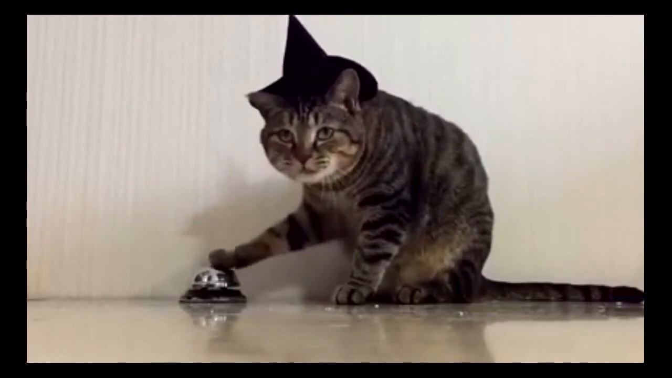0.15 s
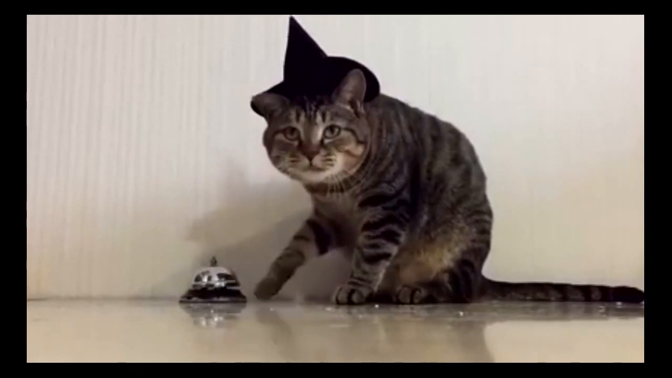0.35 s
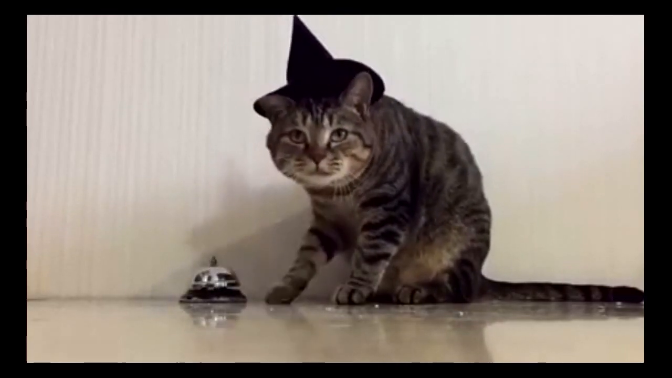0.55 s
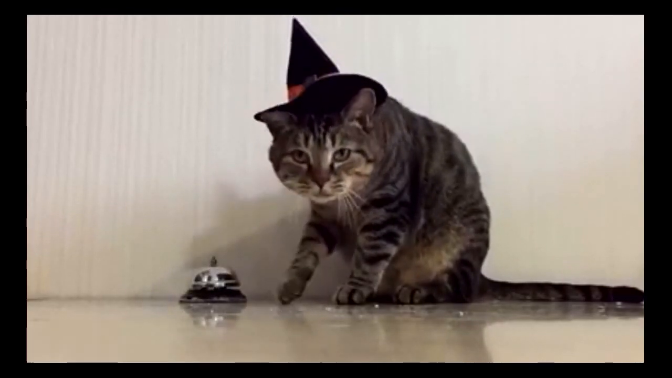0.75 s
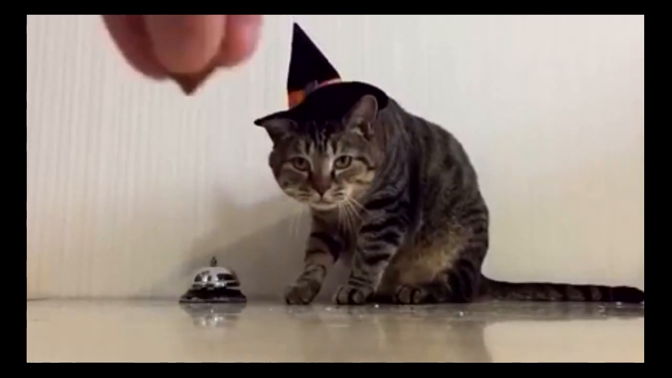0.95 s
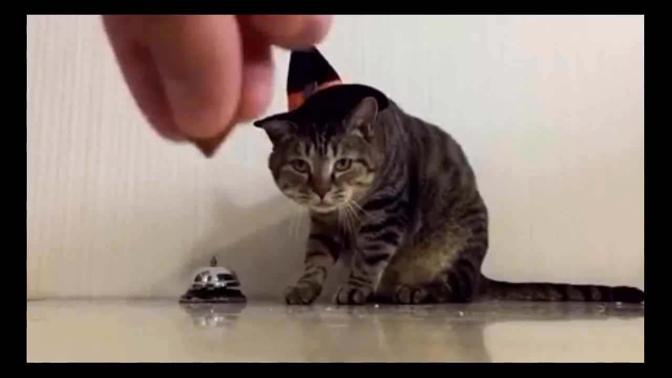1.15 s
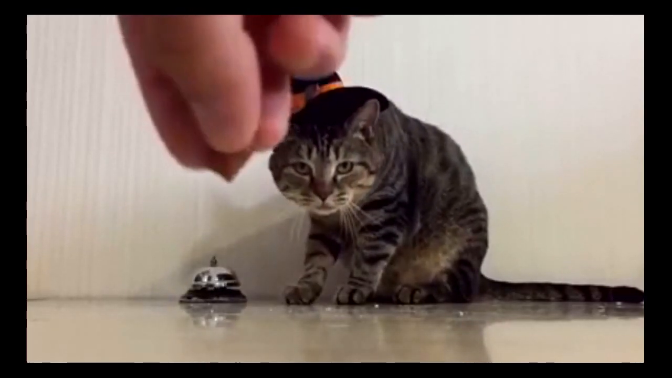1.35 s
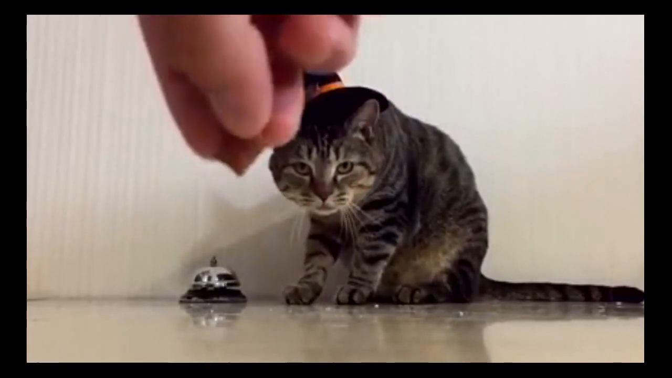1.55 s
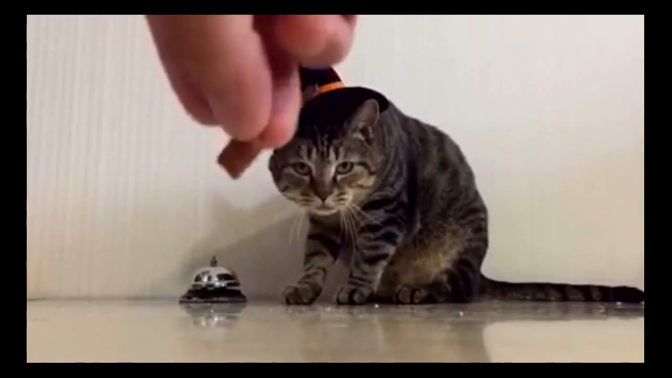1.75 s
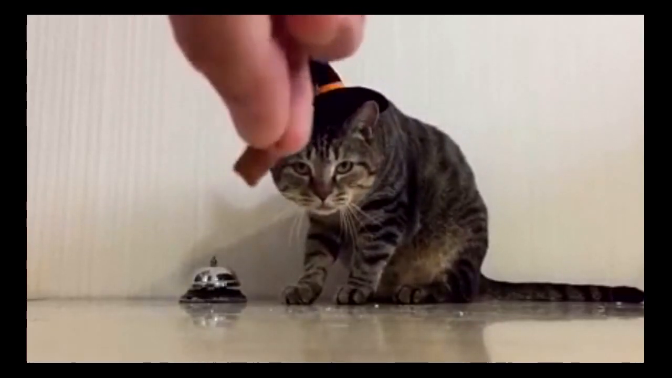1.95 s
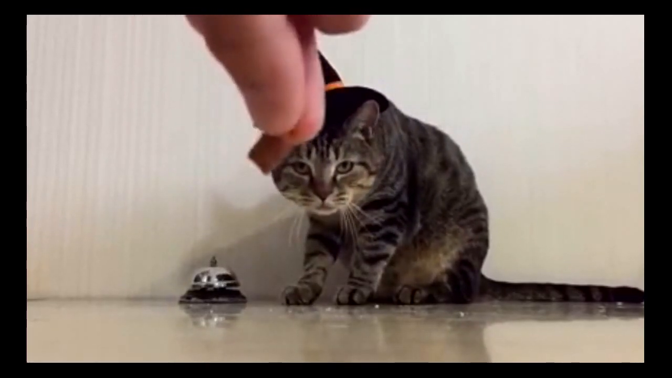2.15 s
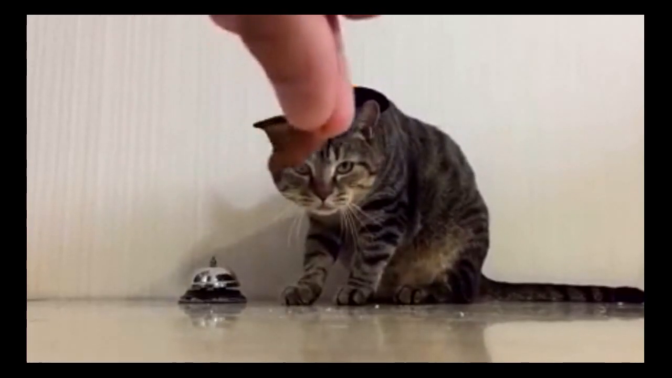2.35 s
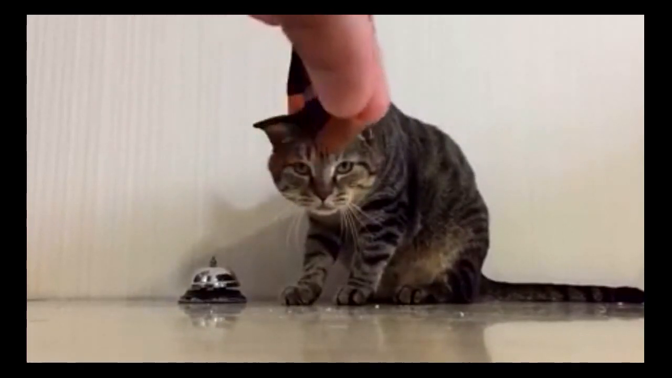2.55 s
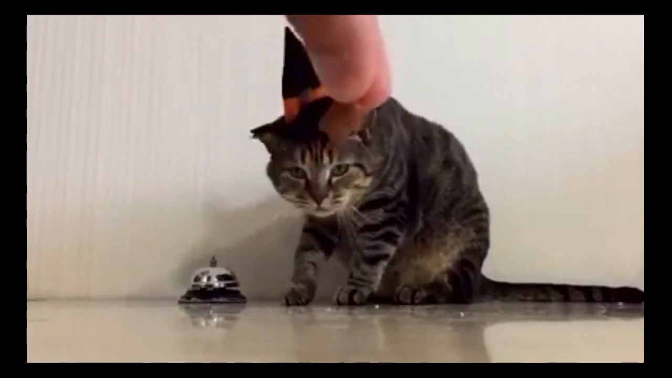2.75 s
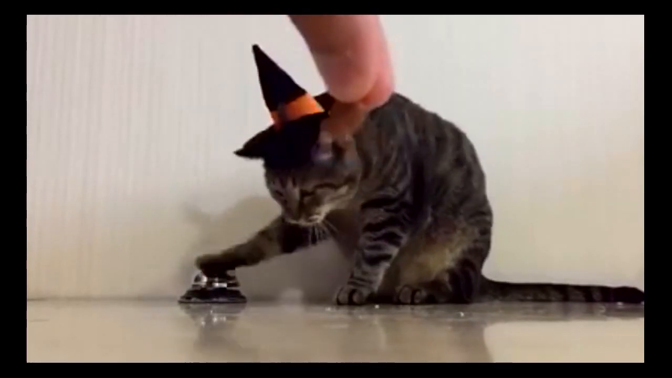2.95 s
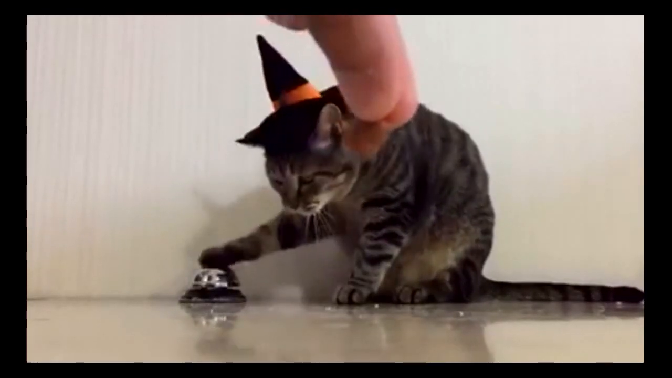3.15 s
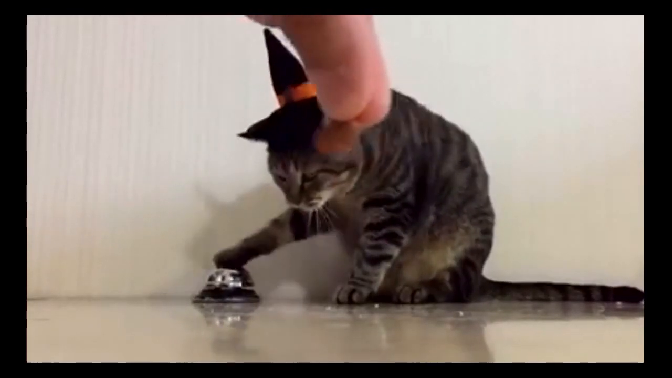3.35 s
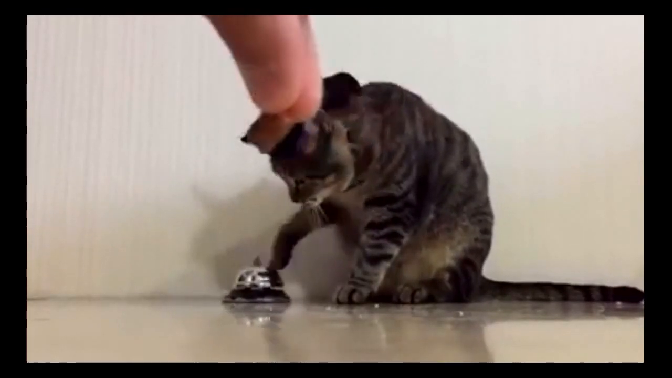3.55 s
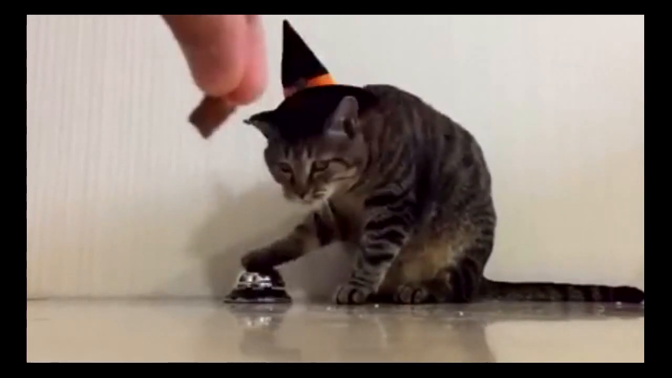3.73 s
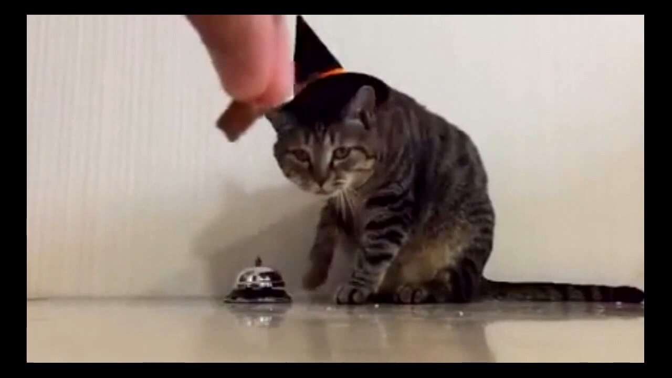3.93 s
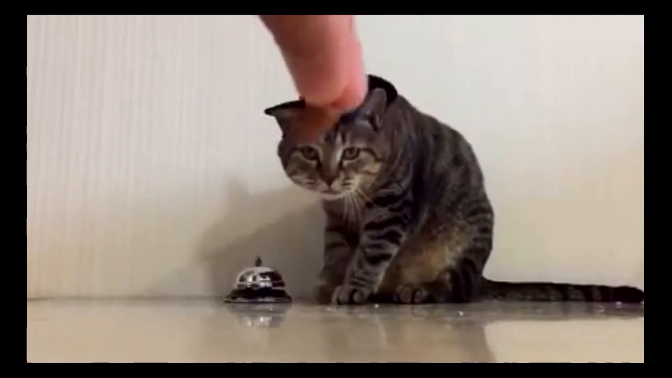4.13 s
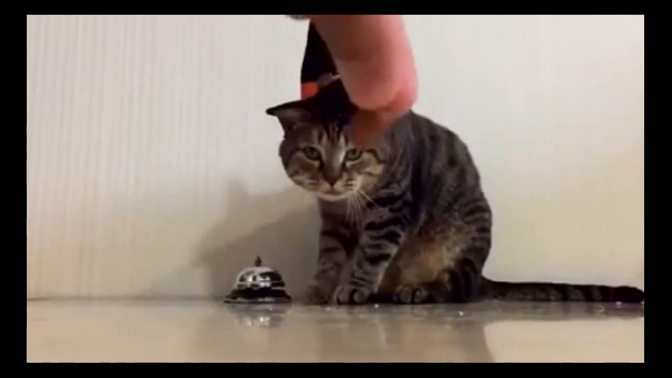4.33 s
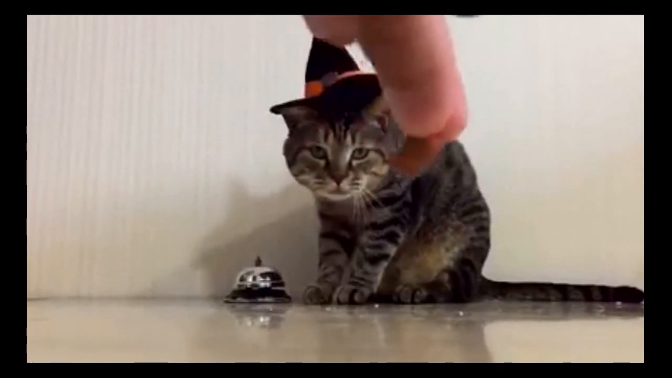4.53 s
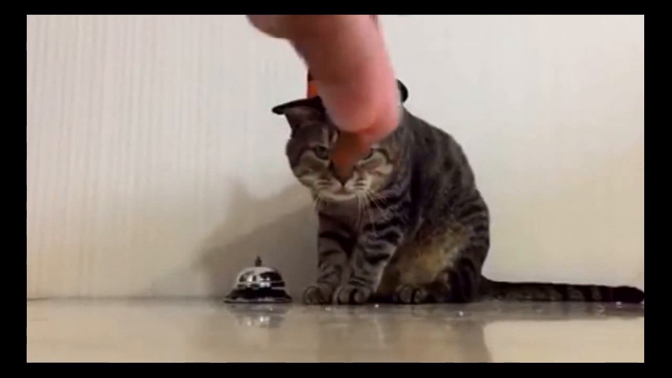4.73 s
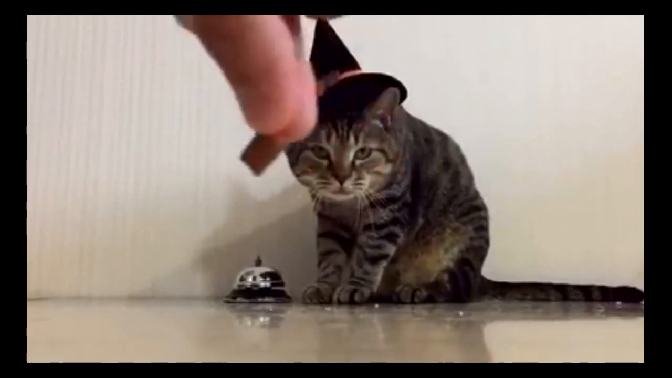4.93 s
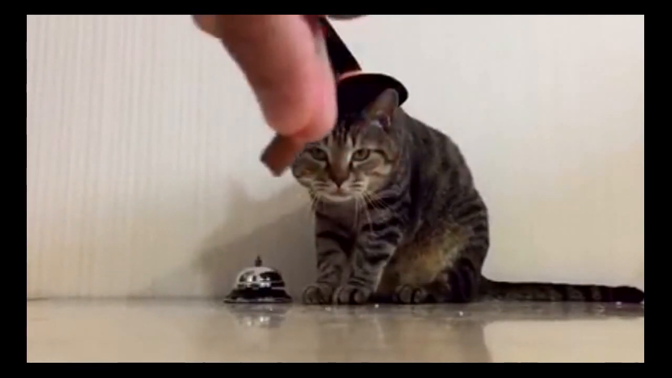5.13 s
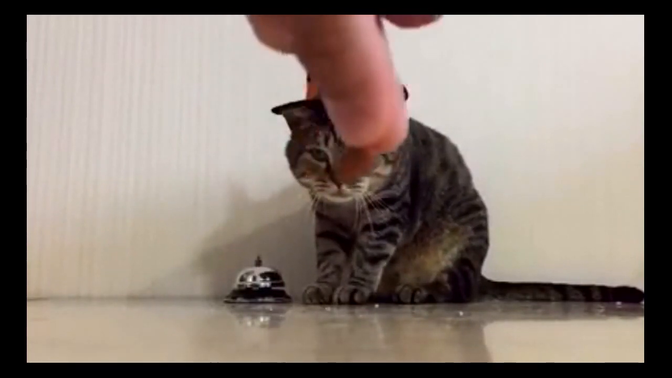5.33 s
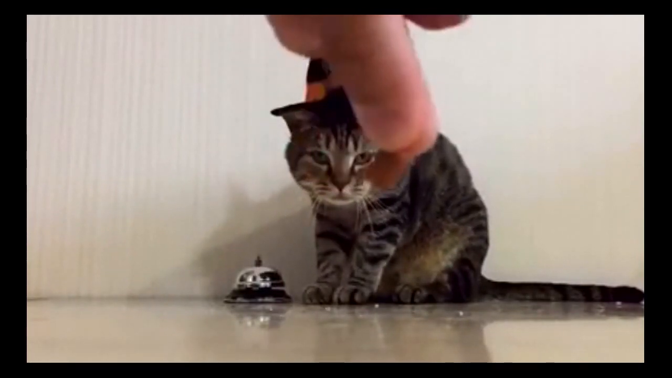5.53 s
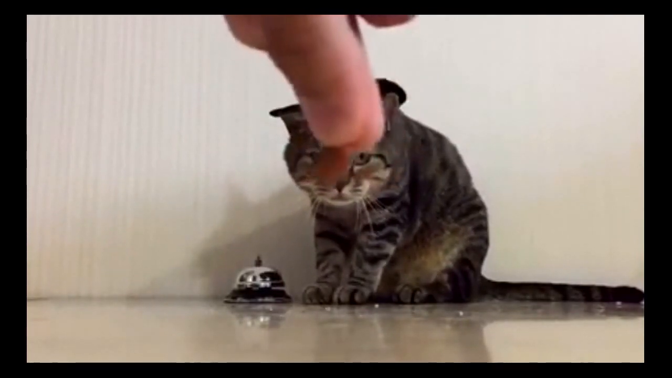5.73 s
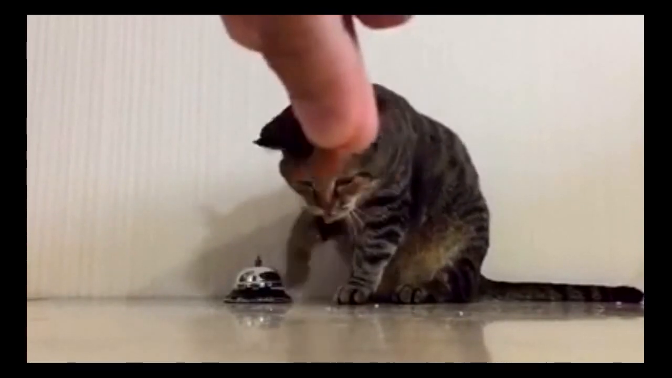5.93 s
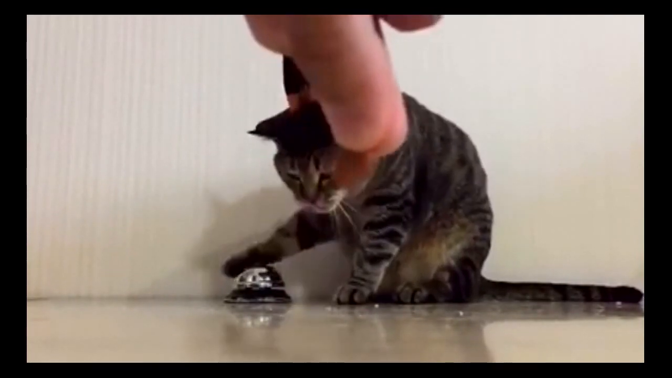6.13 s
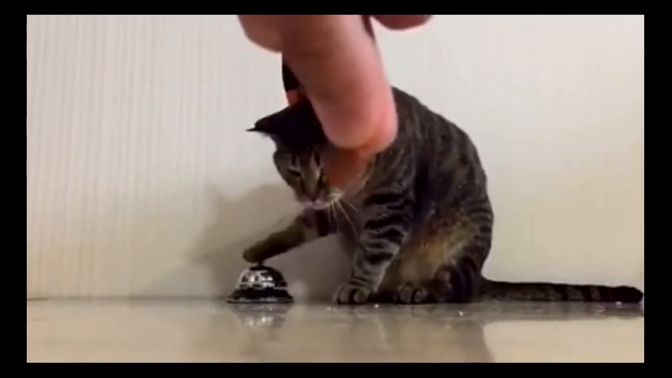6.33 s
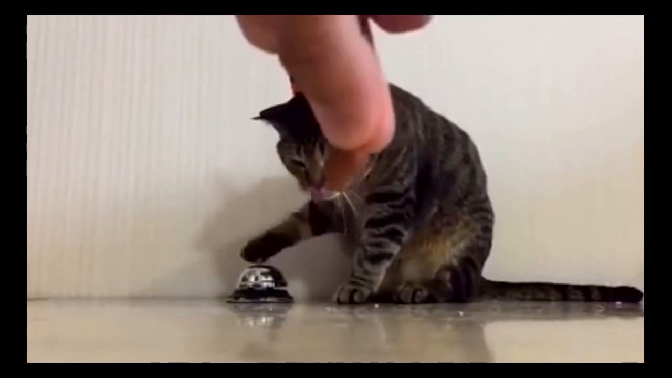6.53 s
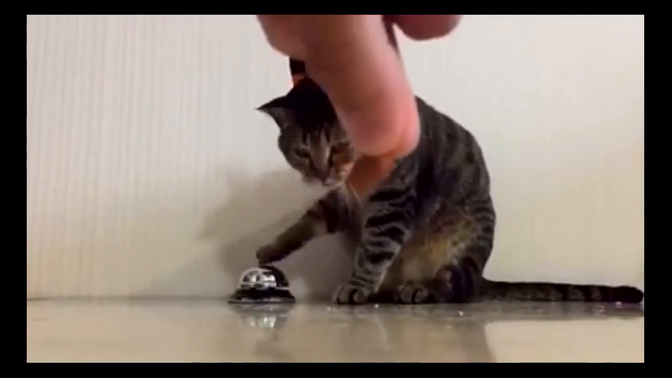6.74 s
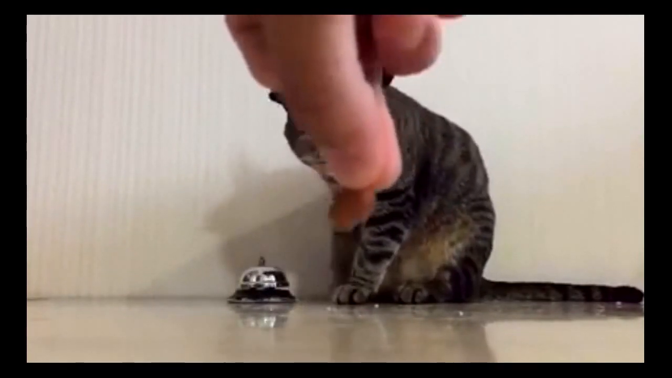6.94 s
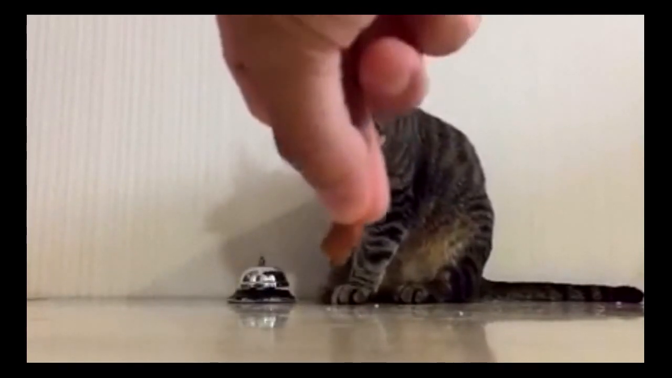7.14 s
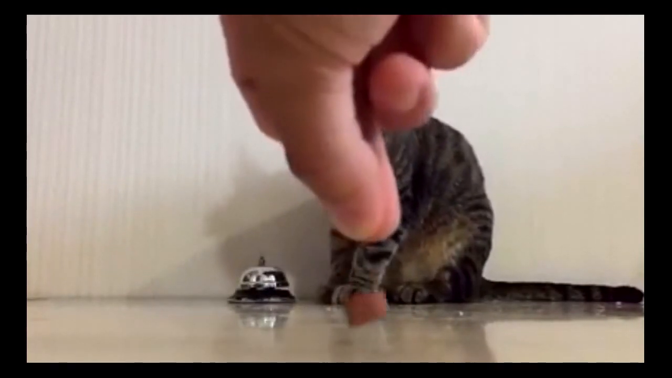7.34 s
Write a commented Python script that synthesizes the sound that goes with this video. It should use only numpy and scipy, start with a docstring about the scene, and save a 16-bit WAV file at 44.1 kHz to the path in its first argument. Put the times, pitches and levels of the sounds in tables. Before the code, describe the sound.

Close view of a cat pawing a service bell on a hard floor. Sharp metallic cracks with small clatters and soft floor thuds open each bright, warbling ding. One strike comes early, one mid-way after scratchy fumbling, and a quick pair late, the last left ringing. The room is quiet, with low rumble, weak hum and soft hiss, picked up by a phone a metre off.

```python
"""A cat paws a steel counter bell on a tiled floor in a quiet room, heard by a phone a metre off.
A ring from a blow just before the start gives way to blows at 0.1, 3.9, 6.4 and 6.8 s: decaying sines for
the partials, noise for the crack, clatter and floor thud. Each new blow stops the old ring.
Noise bursts tick, scrape and swell around the blows; the 3 kHz line dips near 2.9 s, then swells.
Soft rumble, drone, hum and hiss (filtered noise) run throughout; nothing is heard above 15 kHz."""
import sys
import numpy as np
from scipy import signal
from scipy.fft import rfft, irfft, next_fast_len
from scipy.io import wavfile
from scipy.ndimage import uniform_filter1d

SR = 44100
rng = np.random.default_rng(int(sys.argv[2]) if len(sys.argv) > 2 else 0)


def materialize(psi):
    """Save the field psi as 16-bit PCM at rate SR to the path in sys.argv[1].

    A 1-D psi becomes a single channel; in a 2-D psi each row is a channel.
    """
    bounded = np.clip(np.atleast_2d(psi).T, -1, 1)
    quanta = np.round(bounded * 32767).astype(np.int16)
    wavfile.write(sys.argv[1], SR, quanta)


N = 329861

# clapper blows: start/s, force/dB, low pair/dB, 3 kHz lines/dB, 5.7 kHz line/dB, lean of low pair/dB,
# lean of top partials/dB, start phase of low beat/turns, clapper bounce delay/s, floor thud/dB
BLOWS = [(-.05, -3, -0.5, -3.5, 1.5, -4, 0.5, 0.46, 0.0023, -56.5),
         (.145, -1.1, -0.06, 1, -0.4, 0.3, 12.5, .15, 0.00091, -49.5),
         (3.898, -1.55, -1, -0.5, -1.5, -0.5, -6, .49, 0.0013, -48),
         (6.351, 0.8, 0.5, -0.4, -4.5, 0.07, -17, 0.72, 0.0098, -44.5),
         (6.829, -4.5, -5.5, 2.5, 5, 2.5, -11, 0.2, 0.0027, -48)]
# short partials of dome, clapper and base: f/Hz
CLANK_HZ = [3540, 4390, 4651, 5297, 6729, 7154, 8097, 8450, 9211, 9910, 10853]
# same partials, one row each: struck level/dB, t60/s, level in metal chatter/dB
CLANK = [(-24.5, 0.049, 5.5), (-31.5, 0.17, -7.5), (-28.5, 0.17, -10), (-44, 2.1, -7), (-25, 0.02, -30),
         (-24.5, 0.041, -28.5), (3, 0.073, -3.5), (-16, .15, -10.5), (-30, 0.62, -21.5), (-10, 0.11, -6),
         (-15.5, 0.17, -4.5)]


def undb(db):
    """Amplitude factor of a level in dB."""
    return 10 ** (np.asarray(db) / 20)


def level(x, db):
    """Scale to an rms level in dB."""
    return x * undb(db) / np.sqrt(np.mean(x ** 2))


def coloured(points):
    """Noise shaped by (f/Hz, level/dB) points, joined over log frequency."""
    hz, db = np.transpose(points)
    bins_hz = np.arange(N // 2 + 1) * SR / N + 1
    gain = undb(np.interp(np.log(bins_hz), np.log(hz), db, -90, -90))
    return irfft(rfft(rng.standard_normal(N)) * gain, N)


def band(hz, octaves, size=N):
    """Noise band of rms 1."""
    edges_hz = np.clip([hz * 2 ** (-octaves / 2), hz * 2 ** (octaves / 2)], 20, .45 * SR)
    sos = signal.butter(4, edges_hz, "bandpass", fs=SR, output="sos")
    return level(signal.sosfilt(sos, rng.standard_normal(size)), 0)


def walk(rate_hz):
    """Random levels held 1 / rate_hz s and smoothed twice."""
    hold = int(SR / rate_hz)
    steps = np.repeat(rng.standard_normal(N // hold + 1), hold)
    return uniform_filter1d(uniform_filter1d(steps, hold), hold)[:N]


def fade(age, rise_s, t60_s):
    """Zero before the start, an exponential rise, then an exponential decay."""
    age = np.maximum(age, 0)
    return (1 - np.exp(-age / max(rise_s, 1e-4))) * np.exp(-np.log(1000) * age / t60_s)


def blow_spans(t):
    """Each blow's row, samples (to 50 ms past the next blow), age/s and damping from the next blow on."""
    stops = [row[0] for row in BLOWS[1:]] + [t[-1] + 1]
    for row, stop in zip(BLOWS, stops):
        near = slice(max(int(row[0] * SR), 0), int(stop * SR + SR / 20))
        damping = np.exp(-np.maximum(t[near] - stop, 0) / .004)
        yield row, near, t[near] - row[0], damping


def room(t):
    """Slowly swelling rumble and low drone, a weak hum and faint hiss, all filtered noise."""
    # rumble colour: f/Hz, relative level/dB
    rumble_colour = [(15, -32.5), (25, -12), (58, -2), (119, -6), (145, -4), (172, -8), (198, -6.5),
                     (462, -17.5), (723, -14.5), (1000, -27), (1300, -43.5), (2200, -120)]
    # hiss colour: f/Hz, relative level/dB
    hiss_colour = [(600, -1), (1000, 6.5), (2200, -3), (2700, -4.5), (3300, -15.5), (4100, -10),
                   (4800, -17.5), (7000, -19.5), (9500, -21), (11000, -44)]
    # drone: t/s, level/dB
    drone_levels = [(0, -83), (.37, -66), (.62, -81), (.76, -65.5), (1.1, -80), (2.1, -70.5), (2.5, -80),
                    (3.2, -73.5), (4.1, -80.5), (4.8, -67.5), (5.35, -71), (5.6, -79.5), (7.48, -77.5)]
    rumble_db, hiss_db, hum_db = -72, -73.5, -80
    drone_hz, drone_width_hz = 149.1, 13
    hum_hz, hum_width_hz = 99, 5
    rumble = level(coloured(rumble_colour) * undb(2.3 * walk(3)), rumble_db)
    drone = band(drone_hz, drone_width_hz / drone_hz)
    drone = drone * undb(np.interp(t, *np.transpose(drone_levels)))
    hum = band(hum_hz, hum_width_hz / hum_hz) * undb(hum_db)
    hiss = level(coloured(hiss_colour) * undb(walk(3.4)), hiss_db)
    return rumble + drone + hum + hiss


def chatter():
    """Dense tiny knocks ringing resonators at the short partials, rms 1."""
    knocks = rng.standard_normal(N) * undb(5 * walk(250))
    out = 0
    for hz, (_, _, db) in zip(CLANK_HZ, CLANK):
        q = 13 * (hz / 3500) ** 1.9  # high partials ring cleaner
        peak = signal.iirpeak(hz, q, fs=SR)
        out = out + level(signal.lfilter(*peak, signal.lfilter(*peak, knocks)), db)
    return level(out, 0)


def gritty_bursts(t):
    """Ticks, scrapes and a short noisy swell just ahead of some blows: noise, metal chatter, low thud."""
    # bursts: t/s, noise level/dB, centre f/Hz, rise/s, low thud/dB
    bursts = [(0.123, -48.5, 4300, 0.0088, -68.5), (.36, -73, 3700, 0.047, -83),
              (.45, -62.5, 3730, 0.034, -82), (3.19, -71, 6400, 0.0064, -56),
              (3.354, -64.5, 6870, 0.018, -57), (3.401, -52.5, 4670, 0.017, -52),
              (3.411, -62, 4050, .001, -65), (3.64, -62.5, 6800, 0.016, -76), (3.791, -50, 4600, .001, -71),
              (3.85, -48.5, 4200, 0.00052, -61), (3.877, -62, 5000, 0.0024, -53),
              (3.887, -46, 5000, 0.0028, -62.5), (4.061, -72.5, 3800, 0.05, -73),
              (4.125, -63, 3800, 0.0092, -76.5), (6.299, -49.5, 6000, 0.048, -75),
              (6.344, -49, 4500, 0.0014, -73), (6.42, -65, 3500, 0.045, -62),
              (6.651, -59, 3300, 0.031, -77), (6.745, -54.5, 3200, 0.033, -62),
              (6.94, -72.5, 3900, .015, -80), (7.02, -65.5, 3400, 0.0062, -90)]
    burst_t60_s, t60_per_rise = .09, 4.7  # slow bursts also die slowly
    chatter_hz, chatter_db_per_oct = 4600, -22.5  # dull bursts carry more chatter than thin ones
    thud_lead_s = .015  # the thud starts just before the noise
    out, thud, metal = np.zeros(N), band(100, 1.37), chatter()
    grit = undb(3.8 * walk(300))
    knock = undb(-4.5) * band(1500, 2.2)
    for start, db, hz, rise_s, thud_db in bursts:
        first = int((start - .05) * SR)
        near = slice(first, first + SR)
        age = t[near] - start
        noise = grit[near] * (band(hz, 1.15, size=SR)[:len(age)] + knock[near])
        rattle = undb(chatter_db_per_oct * np.log2(hz / chatter_hz)) * metal[near]
        envelope = fade(age, rise_s, burst_t60_s + t60_per_rise * rise_s)
        out[near] += undb(db) * (noise + rattle) * envelope
        out[near] += undb(thud_db) * thud[near] * fade(age + thud_lead_s, .0083, .15)
    return out


def floor_thud(t):
    """Each blow thuds through the floor: two low noise bands."""
    out = np.zeros(N)
    thud = band(95, 1.1) + undb(-6.5) * band(420, 1.6)
    for row, near, age, _ in blow_spans(t):
        out[near] += undb(row[-1]) * thud[near] * fade(age, .006, .18)
    return out


def crack(t):
    """Noise of each blow: first contact, gritty crack, its room tail and the clatter of loose metal."""
    # crack colour: f/Hz, relative level/dB
    crack_colour = [(250, -23), (700, -21.5), (1700, -10.5), (2500, -19.5), (3500, -1.5), (4200, -17),
                    (5200, -5), (7200, -7), (9500, -3), (12000, -11), (13500, -9), (15200, -27)]
    db_per_force_db = 1.5  # the crack grows faster than the ring
    crack_db, tail_db = -31.5, -18  # tail relative to crack
    snap_db, snap_lag_s, snap_t60_s = -29, .0025, .015  # first contact of the clapper
    clatter_db, clatter_t60_s = -41.5, .25
    out, clatter = np.zeros(N), chatter()
    grit = level(coloured(crack_colour), 0) * undb(2.2 * walk(300))
    tail = band(3300, 2.1) * undb(4 * walk(88))  # the room keeps the middle of the crack longest
    for row, near, age, _ in blow_spans(t):
        burst = grit[near] * fade(age, .0011, .13)
        echo = undb(tail_db) * tail[near] * fade(age, .014, .35)
        noise = undb(crack_db) * (burst + echo)
        noise += undb(snap_db) * grit[near] * fade(age - snap_lag_s, .0004, snap_t60_s)
        noise += undb(clatter_db) * clatter[near] * fade(age, .004, clatter_t60_s)
        out[near] += undb(db_per_force_db * row[1]) * noise
    return out


def clank(t):
    """Short partials of dome, clapper and base, started by the clapper bounce."""
    clank_db, rough_db, buzz_grows_s = -20.5, 6, .078
    out = np.zeros(N)
    wobbles_db = [rough_db * walk(90) for _ in CLANK]
    for row, near, age, damping in blow_spans(t):
        _, force_db, *_, bounce_s, _ = row
        strike_db = 1.2 * rng.standard_normal(len(CLANK))  # the clapper never lands the same way twice
        ring = 0
        for hz, (db, t60_s, _), extra_db, wobble_db in zip(CLANK_HZ, CLANK, strike_db, wobbles_db):
            # loose parts buzz as the ring fades
            rough = undb(wobble_db[near] * np.clip(age / buzz_grows_s, 0, 1))
            envelope = undb(clank_db + force_db + db + extra_db) * fade(age - bounce_s, .0023, t60_s)
            ring = ring + rough * envelope * np.sin(2 * np.pi * hz * age)
        out[near] += np.sqrt(2) * ring * damping
    return out


def long_ring(t):
    """Decaying sines: a beating low pair, a 3 kHz line that weaker lines make warble, higher lines."""
    # long-ringing lines: f/Hz
    ring_hz = np.array([1124.2, 1162.2, 3019.5, 3019.4, 3044, 2995, 5684.8, 8785.6, 11886, 12920, 13356])
    # their decay: t60/s
    ring_t60_s = [8.5, 11.06, 3.456, 6.46, 4.3, 4.7, 1.997, 0.61, 0.13, .24, 0.11]
    # their level before force, group and lean: level/dB
    ring_db = [-46, -42.5, -35, -70.5, -53, -58, -27.5, -23, -40, -48.5, -44]
    # their sign as the landing spot tips the split pairs: lean/1
    leans = [-1, 1, 0, 0, 0, 0, 0, 0, 1, 1, -1]
    # their flutter: depth/dB
    flutter_db = [.3, .3, 2., 1.2, 3., 6.5, 1.2, 1.5, 3.8, 3., 1.9]
    # slow level changes of the ring: t/s, change of low pair/dB, change of 3 kHz line/dB
    ring_changes = [(2.5, -0.8, -2.8), (2.88, 0.2, -11), (3.1, -.5, 11), (3.32, -4.5, 8.5), (3.5, 1.5, 21),
                    (3.68, 0.5, 20.5), (3.85, -3, 13)]
    flutter_rate_hz, waver_rate_hz, waver_share = 60, 9, .49  # waver as a share of flutter depth
    slow_beat_turns = .35
    out = np.zeros(N)

    # the 3 kHz line dips near 2.9 s, then swells
    change_s, low_db, mid_db = np.transpose(ring_changes)
    low_db = np.interp(t, change_s, low_db, 0, 0)
    mid_db = np.interp(t, change_s, mid_db, 0, 0)
    gains = []
    for hz, depth_db in zip(ring_hz, flutter_db):
        change_db = low_db if hz < 2000 else mid_db * (3010 < hz < 3030)
        sway = walk(flutter_rate_hz) + waver_share * walk(waver_rate_hz)
        gains.append(undb(change_db + depth_db * sway))

    for row, near, age, damping in blow_spans(t):
        _, force_db, pair_db, mid_lines_db, line_db, low_lean_db, top_lean_db, beat_turns, bounce_s, _ = row
        turns = np.zeros(len(ring_hz))
        turns[0], turns[3] = beat_turns, slow_beat_turns
        group_db = np.select([ring_hz < 2000, ring_hz < 4000, ring_hz < 7000],
                             [pair_db, mid_lines_db, line_db])
        lean_db = np.where(ring_hz < 2000, low_lean_db, top_lean_db) * leans
        long_db = force_db + group_db + ring_db + lean_db
        ring = 0
        for hz, t60_s, db, turn, gain in zip(ring_hz, ring_t60_s, long_db, turns, gains):
            late_s = bounce_s if hz > 7000 else 0  # high partials start with the bounce
            envelope = undb(db) * gain[near] * fade(age - late_s, .0027, t60_s)
            ring = ring + envelope * np.sin(2 * np.pi * (hz * age + turn))
        out[near] += np.sqrt(2) * ring * damping
    return out


def scene():
    """Sum of all sources, on two channels that differ by a slight phase offset."""
    t = np.arange(N) / SR
    side_db = -54
    mid = room(t) + gritty_bursts(t) + floor_thud(t) + crack(t) + clank(t) + long_ring(t)
    side = undb(side_db) * np.imag(signal.hilbert(mid, next_fast_len(N))[:N])
    return np.array([mid + side, mid - side])


def record(dry):
    """Nothing is heard above 15 kHz: steep elliptic low-pass."""
    top_hz = 15000
    return signal.sosfilt(signal.ellip(8, .2, 70, top_hz, fs=SR, output="sos"), dry)


dry = scene()
out = record(dry)
materialize(out)
```